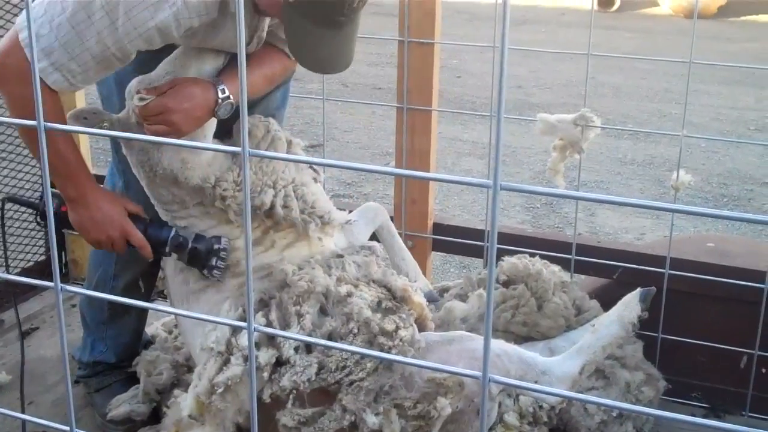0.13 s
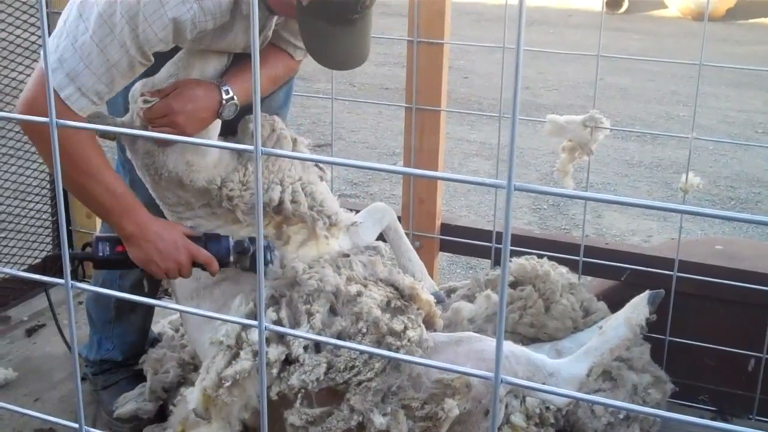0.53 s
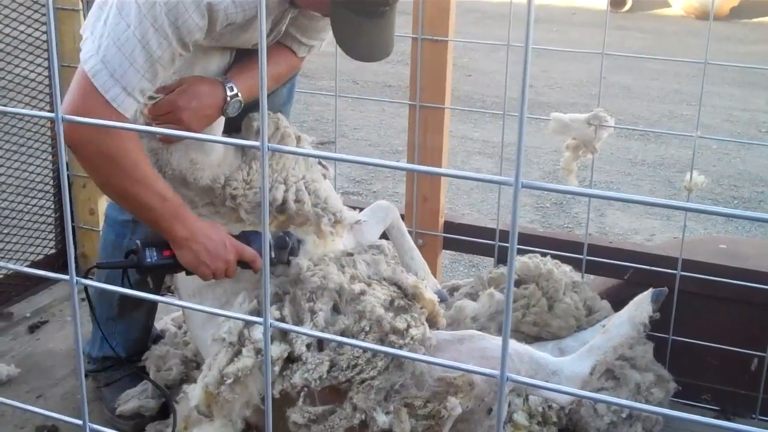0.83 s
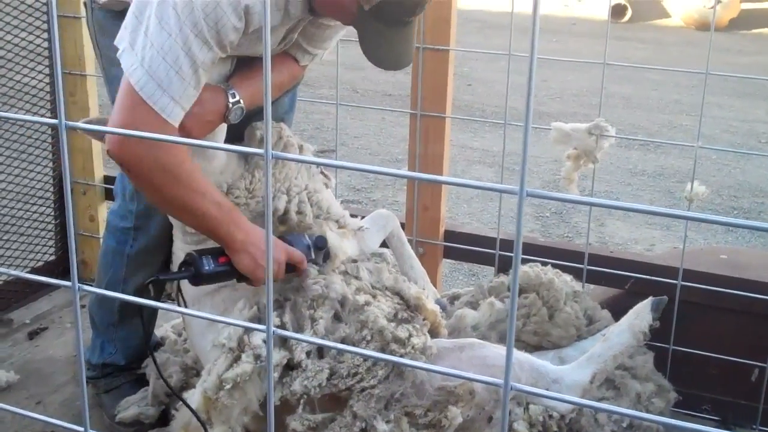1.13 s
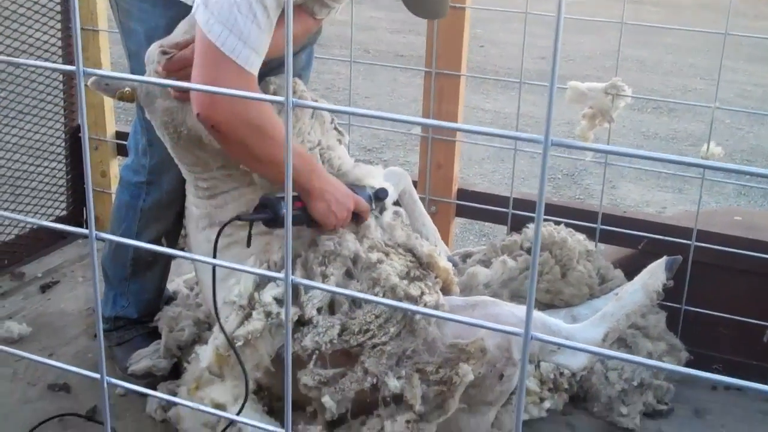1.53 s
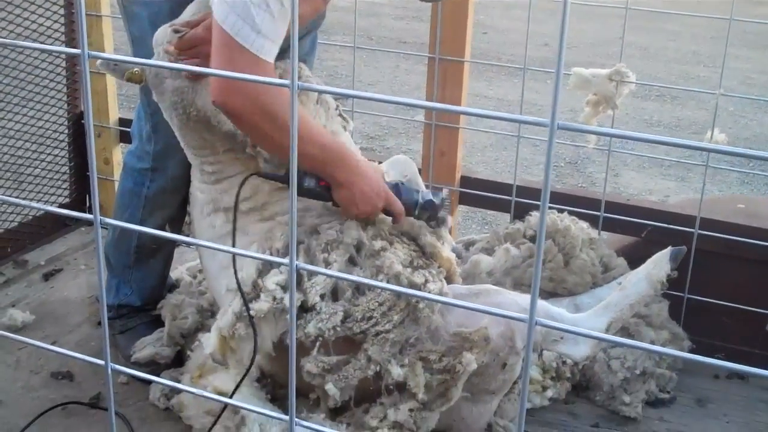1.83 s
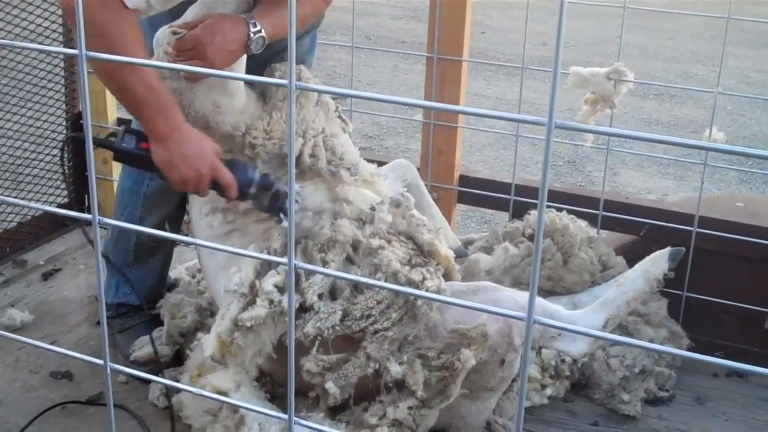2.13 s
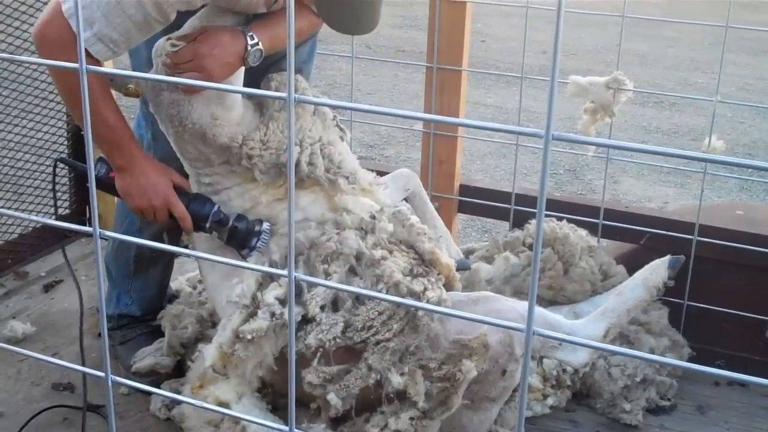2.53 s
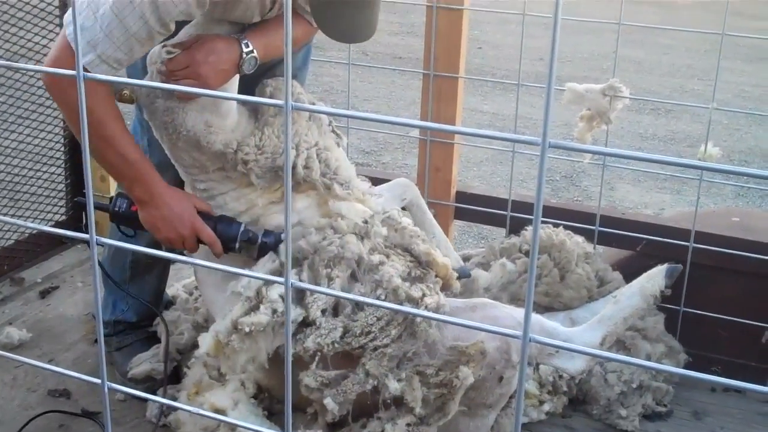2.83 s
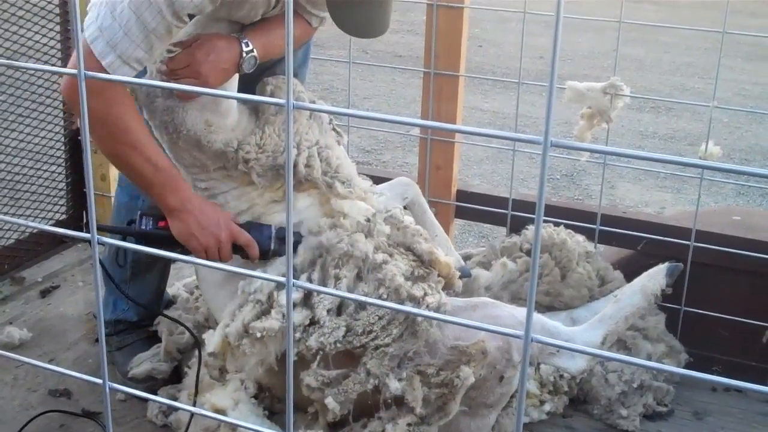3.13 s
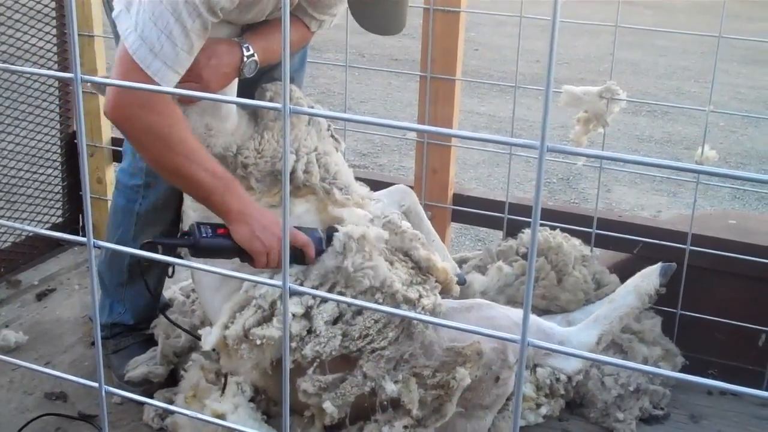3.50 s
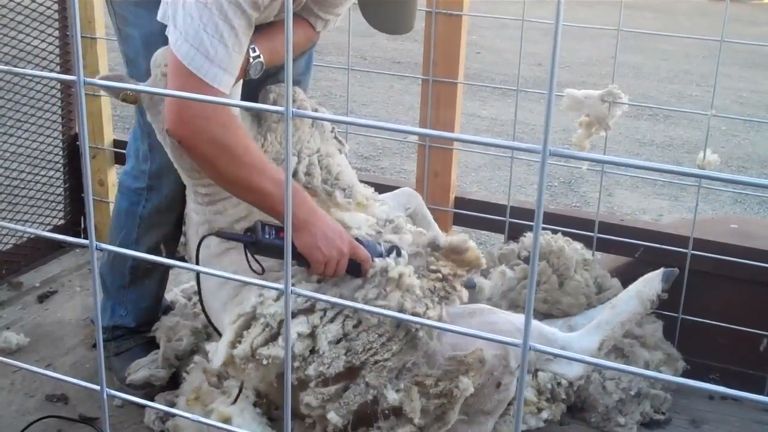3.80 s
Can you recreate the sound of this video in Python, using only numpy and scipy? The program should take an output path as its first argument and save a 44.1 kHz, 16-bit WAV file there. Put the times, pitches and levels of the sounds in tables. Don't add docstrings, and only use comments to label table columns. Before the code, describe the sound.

Electric sheep shears buzz continuously at close range in an outdoor pen, a bright metallic rasp with a thin gear whine, dipping and swelling with each pass; a small camera microphone catches very faint wind.

```python
import sys
import numpy as np
from scipy import signal
from scipy.fft import rfft, irfft, next_fast_len
from scipy.io import wavfile
from scipy.ndimage import uniform_filter1d, map_coordinates

SR = 44100
rng = np.random.default_rng(int(sys.argv[2]) if len(sys.argv) > 2 else 0)


def ratio_of_db(decibels):
    return 10 ** (np.asarray(decibels, float) / 20)


def wav_out(sig):
    wavfile.write(sys.argv[1], SR, np.round(np.clip(np.atleast_2d(sig).T, -1, 1) * 32767).astype(np.int16))


N = 174636

TURNS_PER_STROKE = 5.184
FIRST_STROKE = .06


def unit(x):
    return x / np.sqrt(np.mean(x ** 2) + 1e-20)


def along(points, hz):
    point_hz, value = np.transpose(points)
    return np.interp(np.log(hz + 1), np.log(point_hz + 1), value)


def curves(rows):
    s, *columns = np.transpose(rows)
    return [np.interp(np.arange(N) / SR, s, column) for column in columns]


def wobble(rate):
    knots = rng.standard_normal(int(N * rate / SR) + 4)
    return map_coordinates(knots, [np.arange(N) * rate / SR])


def filtered(x, response):
    size = next_fast_len(N + SR // 2)
    return irfft(rfft(x, size) * response(np.fft.rfftfreq(size, 1 / SR)), size)[..., :N]


def repeating(turns, size, lasts):
    surfaces = rng.standard_normal((int(turns[-1] / lasts) + 3, size))
    return unit(map_coordinates(surfaces, [turns / lasts, turns % 1 * (size - 1)], order=1))


def contact(turns, depth, grit_db, knock):
    # share of a stroke, scrape level in dB.
    scrape = [
        (0, 0),
        (.07, 2),
        (.36, 2.5),
        (.6, 1),
        (.74, -3.5),
        (.87, -9),
        (.95, -7),
        (1, 0),
    ]
    repeat_share, rotor_share, knock_s = 0.54, 0.22, 0.00083
    strokes = turns / TURNS_PER_STROKE + FIRST_STROKE
    index = strokes.astype(int)
    phase = strokes % 1

    rough = unit(rng.standard_normal(N) * ratio_of_db(grit_db * wobble(2500)))
    rough = rough + repeat_share * repeating(strokes / 2, size=1300, lasts=13.91)
    rough = rough + rotor_share * repeating(turns, size=126, lasts=79.65)

    each_db = rng.normal(0, 1, (400, 2))[index]
    scrape_db = depth * np.interp(phase, *np.transpose(scrape)) + 0.75 * each_db[:, 0]
    after_s = phase * TURNS_PER_STROKE / 355
    blow_db = 1.6 * each_db[:, 1] + 2 * (-1.) ** index
    blow = knock * ratio_of_db(blow_db) * np.exp(-after_s / knock_s)
    return rough * (ratio_of_db(scrape_db) + blow)


def body(x, spectrum, patchy_db):
    cepstrum = irfft(np.log(ratio_of_db(along(spectrum, np.fft.rfftfreq(4096, 1 / SR))) + 1e-5))
    cepstrum[1:2048] *= 2
    cepstrum[2049:] = 0
    ringing = irfft(np.exp(rfft(cepstrum)))
    z = signal.stft(signal.fftconvolve(x, ringing)[:N], nperseg=512)[2]
    patches = uniform_filter1d(rng.standard_normal(z.shape), 4, 0)
    patches = uniform_filter1d(patches, 24, 1)
    return unit(signal.istft(z * ratio_of_db(patchy_db * unit(patches)), nperseg=512)[1][:N])


def pose(x):
    # time in seconds, hollow between hand and fleece in Hz, its lift in dB, gap under the comb in Hz,
    # its lift in dB, grip open in dB, fork in dB, teeth in dB.
    grip_poses = [(0, 2760, 0.5, 3440, 9, 4, -6, -2), (.25, 2800, 2, 3740, 1, 8, -2.5, -8),
                  (.52, 2950, 6, 3800, -4, 0.5, -1.5, 2), (.62, 2930, 3, 3900, 5, 4, 8, -3),
                  (.76, 3000, -1.5, 3740, 5, 6.5, 4.5, -4), (.9, 3040, 3.5, 3770, 7.5, 8.5, -2, 1),
                  (1.1, 3060, 7, 3300, 3.5, 8.5, 0.5, 6), (1.4, 2980, 4, 3860, 4, 5.5, 2, 3.5),
                  (1.55, 2950, 2.5, 3900, 4, 6.5, 0, -2), (1.62, 2950, -1.5, 4050, 7, 9.5, 3, 1.5),
                  (1.74, 3000, 0, 4250, 8, 13.5, 1, 5), (1.87, 3050, 5, 3800, 3, 10, 1, 2),
                  (2, 3320, 5.5, 3700, 2, 8, 4.5, -2), (2.12, 3200, 2.5, 3600, 5.5, -2, 4, 2),
                  (2.3, 3040, -3, 3750, -2.5, 7.5, -1.5, 0), (2.55, 2880, 6, 3820, 0, 1.5, -3, -5),
                  (2.85, 3180, -2, 3780, -1.5, 5, 2, -3), (3.1, 3130, 2.5, 3720, 6.5, 6.5, -4, 0.5),
                  (3.3, 3090, 4.5, 3720, 2.5, 7.5, 4.5, 2), (3.55, 3100, 6.5, 3660, 10, 12.5, 3.5, 8.5),
                  (3.72, 2970, 7, 3600, 9.5, 6, 9, 3), (3.84, 3000, 11, 3700, 6, 6.5, 8.5, 7),
                  (3.96, 2970, 1, 3650, 11, 8, 8.5, 1)]
    hz, t, z = signal.stft(x, SR, nperseg=512)
    s, *columns = np.transpose(grip_poses)
    columns = [np.interp(t, s, column) for column in columns]
    hollow_hz, hollow_db, gap_hz, gap_db, grip_db, fork_db, teeth_db = columns

    def lobe(centre_hz, width_hz):
        return np.exp(-.5 * ((hz[:, None] - centre_hz) / width_hz) ** 2)

    lift_db = hollow_db * lobe(hollow_hz, 184) + gap_db * lobe(gap_hz, 170)
    lift_db = lift_db + grip_db * lobe(2159, 108)
    lift_db = lift_db + fork_db * lobe(4380, 170) + teeth_db * lobe(5100, 190)
    return signal.istft(z * ratio_of_db(lift_db), SR, nperseg=512)[1][:N]


def gears(turns):
    # time in seconds, whine in dB, its lower beat in dB,
    # its upper beat in dB, its octave in dB.
    gear_swing = [(0.0, -26.0, -34.0, -35.0, -36.0), (0.16, -24.0, -31.0, -31.0, -46.0),
                  (0.28, -23.0, -34.0, -31.0, -35.0), (0.4, -25.0, -38.0, -29.0, -36.0),
                  (0.52, -31.0, -41.0, -37.0, -29.0), (0.65, -41.0, -37.0, -45.0, -38.0),
                  (0.77, -37.0, -44.0, -36.0, -37.0), (0.89, -28.0, -51.0, -34.0, -31.0),
                  (1.01, -28.0, -37.0, -34.0, -34.0), (1.13, -29.0, -39.0, -33.0, -33.0),
                  (1.25, -26.0, -30.0, -33.0, -36.0), (1.37, -28.0, -36.0, -38.0, -41.0),
                  (1.5, -36.0, -40.0, -34.0, -51.0), (1.62, -32.0, -35.0, -39.0, -39.0),
                  (1.74, -27.0, -35.0, -35.0, -38.0), (1.86, -31.0, -38.0, -43.0, -36.0),
                  (1.98, -27.0, -33.0, -38.0, -37.0), (2.1, -22.0, -27.0, -35.0, -33.0),
                  (2.22, -22.0, -31.0, -35.0, -33.0), (2.34, -26.0, -32.0, -41.0, -37.0),
                  (2.46, -39.0, -37.0, -38.0, -62.0), (2.59, -28.0, -35.0, -34.0, -42.0),
                  (2.71, -31.0, -34.0, -44.0, -33.0), (2.83, -27.0, -33.0, -35.0, -35.0),
                  (2.95, -23.0, -28.0, -35.0, -38.0), (3.07, -25.0, -29.0, -36.0, -33.0),
                  (3.19, -26.0, -24.0, -54.0, -27.0), (3.31, -27.0, -29.0, -38.0, -31.0),
                  (3.44, -25.0, -28.0, -35.0, -44.0), (3.56, -28.0, -35.0, -35.0, -32.0),
                  (3.68, -27.0, -52.0, -51.0, -37.0), (3.8, -31.0, -39.0, -40.0, -34.0),
                  (3.96, -27.0, -37.0, -34.0, -57.0)]
    teeth, faintest_db, lift_db = 7, -42, .6
    lower_at, upper_at, octave_at = .46, .3, .33
    whine_db, lower_db, upper_db, octave_db = np.maximum(curves(gear_swing), faintest_db) + lift_db

    stroke = 2 * np.pi * (turns / TURNS_PER_STROKE + FIRST_STROKE)
    mesh = 2 * np.pi * teeth * turns + 0.17 * wobble(29.94)
    whine = ratio_of_db(whine_db + 1.2 * wobble(30)) * np.sin(mesh)
    lower = ratio_of_db(lower_db + wobble(25.3)) * np.sin(mesh - stroke + 2 * np.pi * lower_at)
    upper = ratio_of_db(upper_db + wobble(25.2)) * np.sin(mesh + stroke - 2 * np.pi * upper_at)
    beat = 1 + .95 * np.cos(stroke - 2 * np.pi * octave_at)
    octave = ratio_of_db(octave_db + 1.5 + 1.8 * wobble(30)) * beat * np.sin(2 * mesh + .3 * wobble(60))
    return np.sqrt(2) * (whine + lower + upper + octave)


def shears():
    # time in seconds, motor speed in turns per second; it sags while the blades are in the wool.
    motor_speed = [(0, 358.3), (.2, 357.6), (.4, 355.9), (.7, 353.4), (.9, 350.8), (1.5, 350.5),
                   (1.65, 352.4), (1.85, 357.3), (2.08, 358.9), (2.45, 359.6), (2.7, 359.4), (3, 354.9),
                   (3.2, 352), (3.55, 348.6), (3.75, 349.8), (3.96, 355.5)]
    # time in seconds, level in dB, blades facing the camera in dB, housing uncovered in dB.
    hand_turns = [(0, -19, 3, 4), (.2, -16.5, 1.5, -0.5), (.4, -15.5, -0.5, -1), (.7, -18.5, 2, 2.5),
                  (.9, -18, 0.5, 3), (1.25, -18, -1, 3), (1.5, -17, 1, 4), (1.65, -17, 0, 4.5),
                  (1.85, -18, 1.5, 5.5), (2.08, -15, -1.5, -1.5), (2.3, -15, -3.5, -3.5),
                  (2.45, -21, 4, 1.5), (2.7, -16.5, 2, 0), (3, -16, 0.5, 2.5), (3.2, -16, 0.5, 1.5),
                  (3.55, -18, -1, 2.5), (3.75, -20.5, -0.5, 3), (3.96, -19, -1, -2.5)]
    # frequency in Hz, density in dB per Hz.
    head_colour = [(590, -46.5), (1000, -42.5), (1310, -22), (1540, -6.5), (1840, -12), (2400, -3),
                   (2650, -4.5), (3070, -0.5), (4400, -9), (5720, -29.5), (9680, -120)]
    # frequency in Hz, density in dB per Hz.
    blade_colour = [(2350, -34.5), (4000, -6), (5080, 0.5), (6000, -7), (10300, -24), (12200, -42),
                    (13900, -42.5)]
    # frequency in Hz, density in dB per Hz.
    housing_colour = [(260, -45.5), (450, -11), (519, -19), (619, -2), (695, 3), (1030, -1.5), (1300, 3),
                      (1690, -10), (2860, -120)]
    # frequency in Hz, density in dB per Hz.
    fan_colour = [(4410, -41), (7500, 2.5), (8230, -5), (9170, -4), (11400, -6.5), (13900, -16)]
    head_db, blades_db, housing_db, fan_db, hum_db = -3.5, -8.5, -24, -24.5, -57
    knock_gain = 2.15
    turns = np.cumsum(curves(motor_speed)[0]) / SR
    level_db, facing_db, bare_db = curves(hand_turns)

    head = contact(turns, depth=0.5, grit_db=2.3, knock=0.07 * knock_gain)
    head = ratio_of_db(head_db) * body(head, head_colour, patchy_db=.8)
    blades = contact(turns, depth=0.75, grit_db=2.8, knock=0.14 * knock_gain)
    blades = ratio_of_db(blades_db + facing_db) * body(blades, blade_colour, patchy_db=.8)
    housing = contact(turns, depth=0.25, grit_db=3.5, knock=0.24 * knock_gain)
    housing = ratio_of_db(housing_db + bare_db) * body(housing, housing_colour, patchy_db=0.5)

    fan = body(rng.standard_normal(N), fan_colour, patchy_db=2.3)
    fan = ratio_of_db(fan_db + 0.47 * facing_db + 0.92 * wobble(5.72)) * fan
    hum_level_db = hum_db + 0.46 * (level_db - level_db.mean()) + 0.29 * wobble(11.0)
    hum = ratio_of_db(hum_level_db) * np.sin(2 * np.pi * turns + 0.13 * wobble(19))
    return ratio_of_db(level_db) * (pose(head + blades) + housing + fan) + gears(turns) + np.sqrt(2) * hum


def air():
    # time in seconds, wind strength in dB.
    wind_strength = [(0.0, -44), (0.02, -73), (0.77, -77), (1.31, -67), (1.5, -72), (1.56, -70),
                     (1.96, -64), (2.14, -56), (2.27, -79), (2.75, -52), (2.84, -72), (2.92, -51),
                     (3.39, -59), (3.47, -70), (3.73, -39), (3.78, -53), (3.8, -44), (3.96, -62)]
    # frequency in Hz, density in dB per Hz.
    buffet_colour = [(15, 0.5), (40, 5.5), (100, -5.5), (220, -19), (400, -70)]
    # frequency in Hz, density in dB per Hz.
    yard_colour = [(53, -46), (90, -35), (285, 3), (318, -11), (330, 8), (430, -42), (730, -120)]
    yard_db = -66
    port_db = np.array([[4.5], [-9]])
    strength_db, = curves(wind_strength)
    lumps = rng.standard_normal((2, N)) * ratio_of_db(4.0 * np.array([wobble(29), wobble(20)]))
    buffet = unit(filtered(lumps, lambda hz: ratio_of_db(along(buffet_colour, hz))))
    yard = unit(filtered(rng.standard_normal(N), lambda hz: ratio_of_db(along(yard_colour, hz))))
    return ratio_of_db(strength_db + port_db) * buffet + ratio_of_db(yard_db + 1.9 * wobble(3.6)) * yard


def scene():
    # frequency in Hz, side over mid in dB.
    scatter = [(300, -22), (700, -21), (1500, -15), (3000, -15), (6000, -7.5), (9000, -6.5), (13000, 6.5)]
    # frequency in Hz, left over right in dB.
    lean = [(300, 0), (1200, 1), (4000, 2), (7400, 3), (13000, -2.5)]
    lag_s = 1.2e-5
    tool = shears()
    z = signal.stft(tool, nperseg=512)[2]
    drift = uniform_filter1d(rng.standard_normal((2,) + z.shape), 12, 2)
    random_phase = np.exp(1j * np.arctan2(*drift))
    stray = signal.istft(z * random_phase, nperseg=512)[1][:N]
    side = filtered(stray, lambda hz: ratio_of_db(along(scatter, hz) + 3.0))

    half = np.array([[.5], [-.5]])

    def place(hz):
        return ratio_of_db(half * along(lean, hz)) * np.exp(2j * np.pi * hz * lag_s * half)

    return filtered(np.array([tool + side, tool - side]), place) + air()


def low_pass(x):
    return signal.sosfilt(signal.butter(12, 14040, fs=SR, output="sos"), x)


def record(dry):
    # time in seconds, top of the band in Hz, treble width in dB.
    band_edge = [(0, 12000, 2), (.5, 12300, -1), (.95, 13500, -4), (1.3, 14100, -7), (2.02, 13800, -17),
                 (2.15, 13400, -6), (2.45, 12100, 1), (2.8, 12700, -3), (3.35, 13100, -5.5),
                 (3.6, 14000, -8), (3.96, 13300, -12)]
    ceiling, treble_hz, edge_db = .97, 7950, 3.5
    left, right = dry / (1 + np.abs(dry / ceiling) ** 8) ** (1 / 8)
    hz, t, z = signal.stft([left + right, left - right], SR, nperseg=512)
    s, edge_hz, width_db = np.transpose(band_edge)
    over_khz = np.maximum(hz[:, None] - np.interp(t, s, edge_hz) + 900, 0) / 1e3
    treble = np.clip(hz[:, None] / treble_hz * 4 - 3.5, 0, 1)
    narrow_db = np.interp(t, s, width_db) * treble
    gain_db = np.array([0 * narrow_db, narrow_db]) - edge_db * over_khz ** 2
    mid, side = signal.istft(z * ratio_of_db(gain_db), SR, nperseg=512)[1][:, :N] / 2
    return low_pass(np.array([mid + side, mid - side]))


dry = scene()
out = record(dry)
wav_out(out)
```